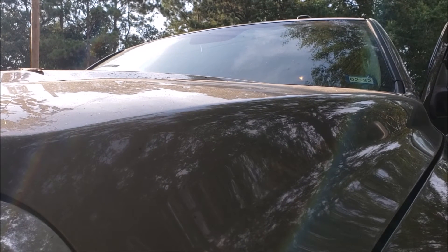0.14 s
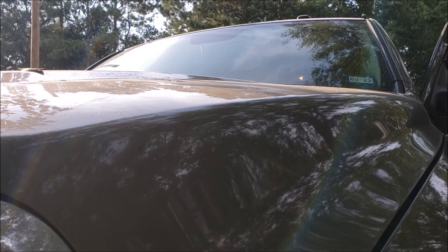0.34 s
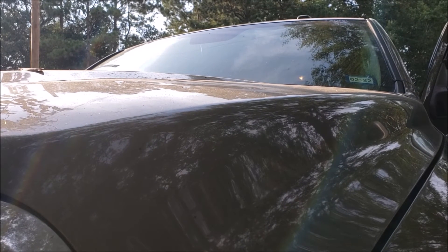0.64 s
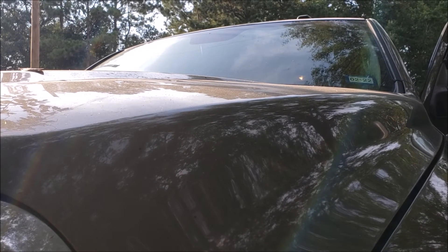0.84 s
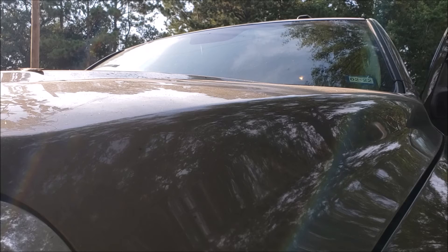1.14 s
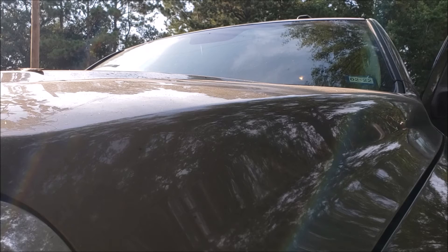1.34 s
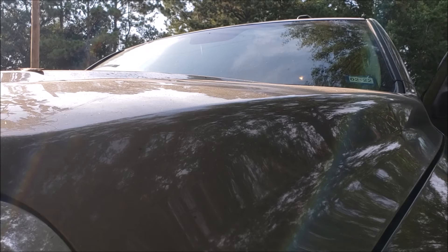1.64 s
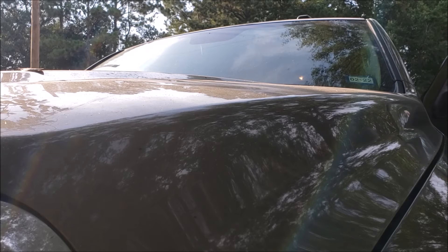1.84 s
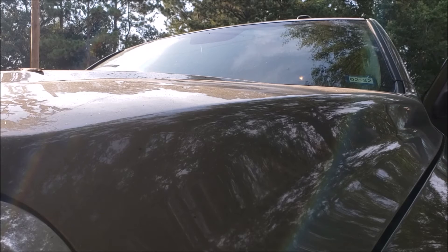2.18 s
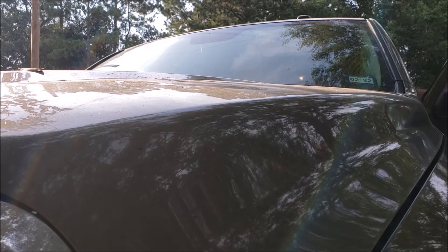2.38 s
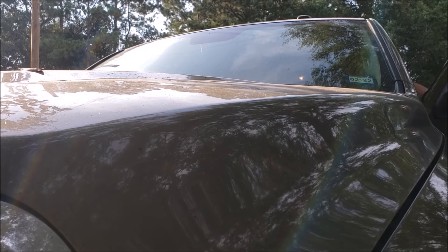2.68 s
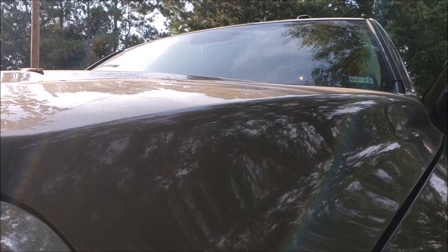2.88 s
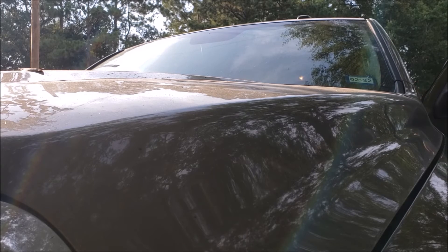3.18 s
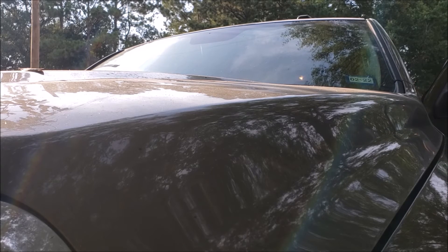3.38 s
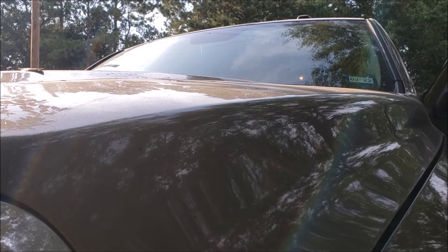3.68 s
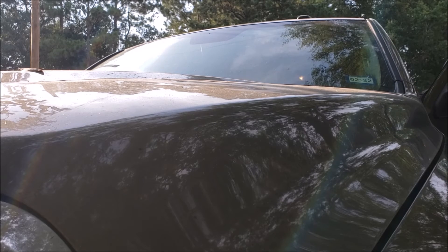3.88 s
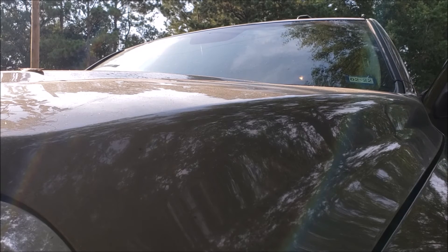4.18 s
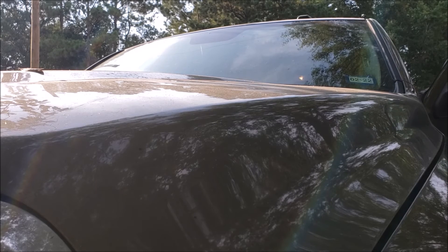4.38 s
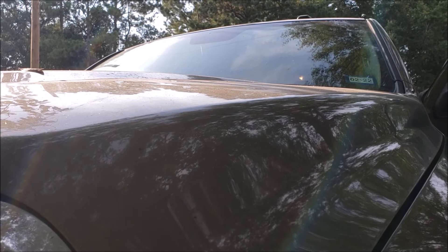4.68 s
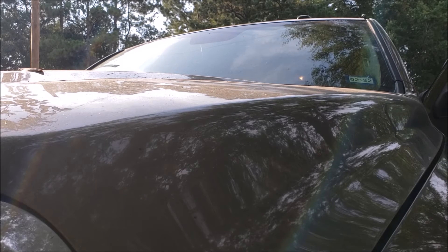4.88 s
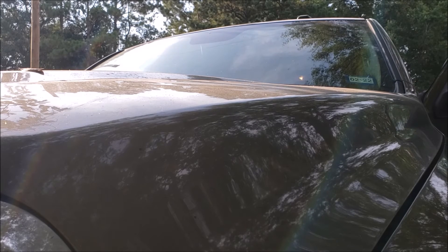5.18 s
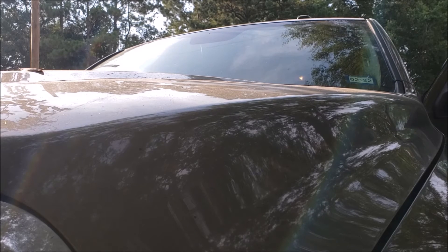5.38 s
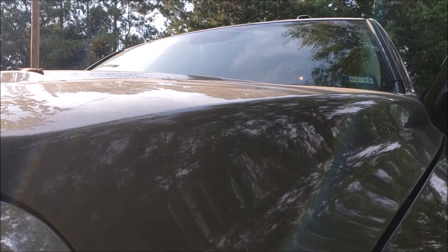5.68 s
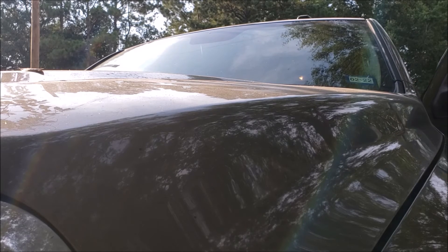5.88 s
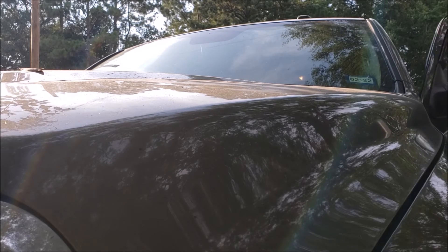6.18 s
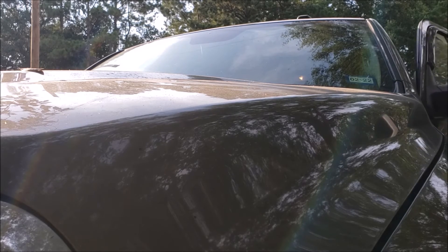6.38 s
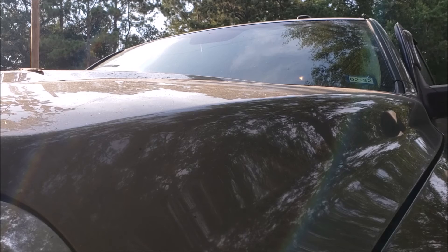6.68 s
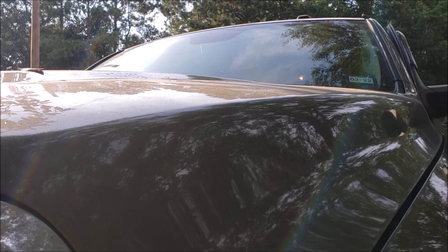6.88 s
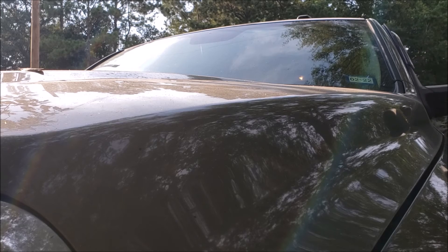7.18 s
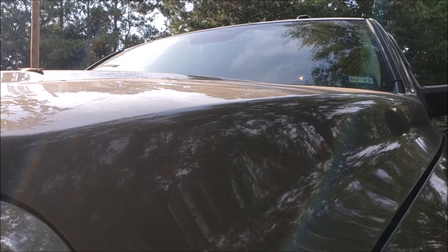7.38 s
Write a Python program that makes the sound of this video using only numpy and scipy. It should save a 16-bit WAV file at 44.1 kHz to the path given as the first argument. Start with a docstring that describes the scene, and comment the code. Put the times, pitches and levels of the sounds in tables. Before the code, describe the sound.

Close by a pickup's fender outdoors, the engine revs briefly, then rumbles roughly and eases down. Around three seconds a twin air horn fires three steady, brassy blasts, each a little longer, opening with a tiny squeal and ending with a quick dulling fade. Faint reflections return from walls and trees. The engine drops to a very quiet idle, and small knocks ring a door panel at the end.

```python
"""A pickup's engine revs under its closed hood and settles to idle; a twin air horn gives three blasts over it.
Each blast opens with a diaphragm squeal, then a low trumpet of summed harmonics beats against a weak higher one.
Pulse trains filtered by short all-pass paths make the slaps; crankshaft orders and shaped noise make the engine.
Walls and trees answer the horn, air hisses faintly, and near the end knocks ring a panel in the cab.
The microphone stands by the fender, and its gain ducks under the horn."""
import sys
import numpy as np
from scipy import signal
from scipy.fft import rfft, irfft, next_fast_len
from scipy.io import wavfile
from scipy.ndimage import uniform_filter1d, minimum_filter1d, map_coordinates

SR = 44100
rng = np.random.default_rng(int(sys.argv[2]) if len(sys.argv) > 2 else 0)


def unload_wav(signal):
    """Save mono or channel-first audio to the path in sys.argv[1] as 16-bit WAV at rate SR, clipped to [-1, 1]."""
    wavfile.write(
        sys.argv[1],
        SR,
        np.round(np.clip(np.atleast_2d(signal).T, -1, 1) * 32767).astype(np.int16),
    )


N = 332514
T = np.arange(N) / SR  # time of each sample [s]


def amp(db):
    """Level law: decibels become an amplitude ratio."""
    return np.exp(np.asarray(db) * (np.log(10) / 20))


def unit(x):
    """Normalisation: equal mean power, rms 1."""
    return x / np.sqrt(np.mean(x ** 2) + 1e-20)


def along(points, hz):
    """Interpolation of (frequency [Hz], value) points on a logarithmic frequency axis."""
    f, v = np.transpose(points)
    return np.interp(np.log(hz + 1), np.log(f + 1), v)


def curves(rows):
    """Linear interpolation in time: one curve for each column after the time."""
    s, *columns = np.transpose(rows)
    return [np.interp(T, s, column) for column in columns]


def wobble(rate, size=N):
    """Band-limited fluctuation: a smooth curve through `rate` random knots a second."""
    knots = rng.standard_normal(int(size * rate / SR) + 4)
    fine = map_coordinates(knots, [np.arange(len(knots) * 10) / 10], mode="nearest")
    return np.interp(np.arange(size) * (10 * rate / SR), np.arange(len(fine)), fine)


def swell(s, half_length):
    """Gaussian envelope: a bell-shaped rise and fall around a moment."""
    return np.exp(-((T - s) / half_length) ** 2)


def rise(t, width):
    """Smooth onset: a hyperbolic-tangent step from 0 to 1 around t = 0."""
    return .5 + .5 * np.tanh(t / width)


def turns(hz):
    """Phase is the running integral of frequency [rad]."""
    return 2 * np.pi * np.cumsum(hz) / SR


def filtered(x, response):
    """Linear filtering: the spectrum times a response of frequency."""
    n = x.shape[-1]
    m = next_fast_len(n + 8192)
    return irfft(rfft(x, m) * response(np.fft.rfftfreq(m, 1 / SR)), m)[..., :n]


def rush(spectrum, size=N):
    """Turbulence noise of rms 1, its stereo coherence high in the bass and low above."""
    def shape(hz):
        coherence = along([(200, 0.85), (1500, 0.07), (5000, 0.13)], hz)
        turn = np.arccos(np.clip(coherence, -1, 1)) / 2
        return amp(along(spectrum, hz)) * [np.cos(turn), np.sin(turn)]

    mid, side = filtered(rng.standard_normal((2, size)), shape)
    return unit(np.array([mid + side, mid - side]))


# harmonics of the high trumpet: (order, relative level [dB])
HIGH_TRUMPET = [(1, -47), (2, -50.5), (3, -60.5), (4, -54.5), (6, -52)]
# air rushing through the horn: (frequency [Hz], spectral level [dB per Hz])
AIR_SPECTRUM = [(250, -26.5), (500, -23.5), (640, -6.5), (800, -10.5), (1000, -7), (1500, -2.5), (2150, -8),
                (2450, -8.5), (3100, -6.5), (4300, -12.5), (8000, -29), (15000, -34)]


def blast(bay, opens, closes, pitch_hz):
    """Valve-driven diaphragm: it squeals, two trumpets beat, and the falling pressure dulls and fades them."""
    t = np.arange(round((opens - .02) * SR), round((closes + .2) * SR)) / SR
    size, speaks = len(t), opens + 0.039  # the squeal comes before the trumpet speaks
    since, emptying = np.maximum(t - speaks, 0), np.maximum(t - closes, 0)
    fade = amp(-25 * (emptying / 0.081) ** 3.3)
    slack = 1 - np.exp(-emptying / .024)  # lost share of the air pressure

    # the diaphragm starts a little sharp, never repeats a cycle exactly, and creeps sharp as the line empties
    low_hz = pitch_hz * (1 + .012 * np.exp(-since / 0.013) + 0.0087 * slack)
    phase = turns(low_hz) + 0.0039 * wobble(180, size)
    # the high trumpet slides up to a minor third above the low one
    interval = 6 / 5 - 0.067 * np.exp(-since / 0.083) + 0.0018 * wobble(31, size)
    high = turns(pitch_hz * interval)
    beat = high - phase
    beat = beat - np.interp(speaks + 0.003, t, beat)

    low = trumpet(phase, beat - 1, slack, pitch_hz, pull=0.052, throb=0.047, dulling_db=12.5, dispersion=0.0879)
    low = low * amp(0.097 * wobble(200, size))
    second = sum(amp(db - 15 * slack) * np.sqrt(2) * np.cos(k * high) for k, db in HIGH_TRUMPET)
    buzz = amp(-38.5 - 24 * slack) * rasp(phase, beat, bay, throb_db=13.5, scatter_db=.7)
    clatter = amp(-31.5 - 23.0 * slack) * chatter(phase, beat, bay, focus_db=21)
    air = amp(-38.5 - 3.4 * slack) * rush(AIR_SPECTRUM, size)
    air = air * (1 + .5 * np.cos(phase)) * (1 + 0.31 * np.cos(beat - 1))
    # the trumpet leaks faintly before it speaks in full
    leak = 0.11 * rise(t - opens - .012, 0.007) * rise(speaks - t, 0.017)
    voice = (low + second + buzz + clatter + air) * fade * (rise(t - speaks, 0.0026) + leak)

    start = squeal(t, mode_hz=1720, flap_hz=311.1, depth=1.4, rough=.007)
    start = start + amp(-11.5) * rush(AIR_SPECTRUM, size)
    flaps = rasp(turns(np.full(size, 311)), np.zeros(size), bay, throb_db=0, scatter_db=.7)
    start = start + amp(-17) * flaps
    start = start * amp(-21) * rise(t - opens - .01, .006) * rise(speaks - t, .009)
    whole = amp(8) * (voice + start)
    return np.pad(whole, ((0, 0), (round(t[0] * SR), N)))[:, :N]


# harmonics of the low trumpet through the hood: (order, relative left level [dB], relative right level [dB])
LOW_TRUMPET = [(1, -28.5, -30), (2, -17.5, -22.5), (3, -22, -22), (4, -25.5, -27), (5, -30.5, -46),
               (6, -25, -34), (7, -29, -27.5), (8, -29.5, -30.5), (10, -40, -42.5), (11, -32, -46),
               (12, -44.5, -50.5), (13, -33, -49.5), (14, -36, -40.5), (15, -43.5, -39), (16, -54.5, -47.5),
               (21, -44, -55.5), (22, -43, -47.5)]
# phase between the stereo ports: (frequency [Hz], lead of the left [rad])
PORT_LEAD = [(320, 0.0), (640, -0.4), (960, 0.45), (1270, -1.04), (1590, -16.5), (1910, -2.5), (2230, -3),
             (2550, -1.6), (3180, 1.84), (3500, -10.5), (3820, -5), (4780, -4.5)]


def trumpet(phase, beat, slack, pitch_hz, pull, throb, dulling_db, dispersion):
    """Mutual modulation: the beat tugs at each harmonic's phase and strength, most in the high orders."""
    out, cos_beat, sin_beat = np.zeros((2, len(phase))), np.cos(beat), np.sin(beat)
    for order, left_db, right_db in LOW_TRUMPET:
        grip = min(order, 2 + np.pi) - 1
        angle = order * phase + pull * grip * sin_beat - dispersion * order ** 2
        # as the pressure falls, the high harmonics go first
        dulling = amp(-dulling_db * slack * max(np.log(order / 2), 0))
        size = (1 + throb * grip * cos_beat) * dulling
        lead = along(PORT_LEAD, order * pitch_hz) * np.array([[.5], [-.5]])
        out += amp([[left_db], [right_db]]) * size * np.cos(angle + lead)
    return np.sqrt(2) * out


# overtones of the diaphragm's squeal: (order, relative level [dB])
SQUEAL_OVERTONES = [(1, 5), (2, -11.5), (3, -17), (4, -19)]


def squeal(t, mode_hz, flap_hz, depth, rough):
    """Amplitude modulation: a high mode of the diaphragm squeals, bent by its slow flapping."""
    mode = turns(mode_hz * (1 + rough * wobble(420, len(t))))
    flap = turns(flap_hz * (1 + rough * wobble(250, len(t))))
    sides = mode + np.array([[.3], [-.3]])  # phase of each port
    tone = sum(amp(db) * np.exp(1j * k * sides) for k, db in SQUEAL_OVERTONES)
    bending = 1 + depth * np.exp(1.1j) * np.cos(flap) + 0.22 * np.cos(2 * flap)
    bent = np.real(tone * bending)
    return unit(bent + amp(-4.5) * np.cos(2 * flap) + amp(-6.5) * np.cos(flap))


# colour of the diaphragm's slaps: (frequency [Hz], spectral level [dB per Hz])
RASP_SPECTRUM = [(2400, -40.5), (3400, -21), (4400, -5.5), (5000, -8), (5700, -12.5), (6500, -4.5),
                 (7200, -1.5), (8500, -16), (9800, -15), (11000, -6), (15000, -10.5), (16000, -14)]


def rasp(phase, beat, bay, throb_db, scatter_db):
    """Impact excitation: the diaphragm slaps hardest when both trumpets fall in step."""
    out_of_step = beat / (2 * np.pi) % 1
    strength_db = -throb_db * out_of_step + scatter_db * rng.standard_normal(len(phase))
    return slaps(phase, amp(strength_db), bay, RASP_SPECTRUM)


# ringing of the diaphragm's higher modes: (frequency [Hz], spectral level [dB per Hz])
CHATTER_SPECTRUM = [(500, -27.5), (1000, -8.5), (1500, -9.5), (1750, 1), (2200, -0.5), (2450, -11.5),
                    (3100, -14.5), (3500, -12.5), (4400, -7), (5200, -6), (6000, -10), (7100, -4.5),
                    (8400, -31.5), (15000, -33.5)]


def chatter(phase, beat, bay, focus_db):
    """Sidebands: harder slaps once a beat kick the higher modes, putting side tones around each harmonic."""
    kick = amp(focus_db * (np.cos(beat) - 1) + 0.91 * wobble(60, len(beat)))
    return slaps(phase, kick - kick.mean(), bay, CHATTER_SPECTRUM)


def slaps(phase, strength, bay, spectrum):
    """Periodic impulses: one slap of the diaphragm a cycle, smeared by the engine bay."""
    cycles = phase / (2 * np.pi)
    at = np.flatnonzero(np.diff(cycles // 1) > 0)
    # share each impulse between two samples, to keep its exact time
    late = (1 - cycles[at] % 1) / (cycles[at + 1] - cycles[at])
    train = np.zeros(len(phase))
    train[at], train[at + 1] = strength[at] * (1 - late), strength[at] * late
    smeared = signal.fftconvolve(train[None], bay, axes=1)[:, :len(phase)]
    return unit(filtered(smeared, lambda hz: amp(along(spectrum, hz))))


def engine_bay(count):
    """All-pass dispersion: short paths under the hood smear a click without colouring it, one answer per port."""
    bay = np.zeros((2, SR // 16))
    bay[:, 0] = 1
    for port, paths in enumerate(rng.uniform(.0002, .0018, (2, count))):  # round trips [s]
        for path_s in paths:
            loop = np.zeros(round(path_s * SR) + 1)
            loop[0], loop[-1] = 1, -.6
            bay[port] = signal.lfilter(loop[::-1], loop, bay[port])
    return bay


def hood(x):
    """Sympathetic resonance: the hood panel picks up the horn and hums on briefly after it."""
    hood_hz, width_hz = 326.8, 10
    damping = lambda hz: 1j * hz * width_hz
    return amp(-10) * filtered(x, lambda hz: damping(hz) / (hood_hz ** 2 - hz ** 2 + damping(hz)))


# walls that answer the horn: (delay [s], level [dB])
WALL_ECHOES = [(.055, -21.5), (.135, -40.5)]


def walls(horn):
    """Specular reflection: each wall returns a delayed, weaker copy."""
    return sum(amp(db) * np.pad(horn, ((0, 0), (round(delay * SR), 0)))[:, :N] for delay, db in WALL_ECHOES)


# crankshaft speed: (time [s], turns per second [Hz])
CRANK_SPEED = [(.12, 26), (.35, 20.2), (.5, 20), (.62, 21.5), (.76, 19.9), (1.7, 22.7), (2.15, 21.9),
               (3.35, 23.1), (3.65, 24.7), (3.88, 20.2), (4.9, 20.4), (6.3, 20.2), (6.7, 18.9)]
# how hard the engine works, from pulling to idle: (time [s], relative exhaust level [dB])
EXHAUST_EFFORT = [(.4, -33.5), (.8, -25), (1.2, -28), (2, -27), (2.45, -33), (3.3, -39), (4, -34),
                  (5, -34.5), (5.7, -41), (6.05, -50), (6.5, -47), (7.5, -54)]
# load lifts at peaks of speed: (time [s], half length [s], boost of the firing order [dB])
LOAD_LIFTS = [(0.1, 0.12, 15.5), (3.618, .14, 11)]
# exhaust tones beside the firing order: (multiple of crank speed, relative level [dB])
EXHAUST_ORDERS = [(3, -6), (3.5, -23), (5, -8), (5.5, -14), (6, -13), (6.5, -18.5), (7, -4), (7.5, -12.5),
                  (8, -3.5), (9, -18), (10.5, -14.5), (12, -9.5), (13, -11.5), (16, -18), (20, -26.5)]
# resonances of the exhaust pipe: (frequency [Hz], half width [Hz], boost [dB])
PIPE_RESONANCES = [(111.75, 7.9, 12), (147, 9, 8)]
# steady accessory hum: (frequency [Hz], relative level [dB])
ACCESSORY_HUM = [(113.3, -53.5), (182, -63), (226, -66), (242, -59)]
# roar of the engine bay: (time [s], relative rumble level [dB])
BAY_ROAR = [(0, -33.5), (.22, -31.5), (.45, -39), (.62, -32), (.87, -28.5), (1.6, -34), (2.6, -41.5),
            (3.7, -45), (5.2, -46), (6.3, -62), (7.5, -70)]
# fan hiss in that roar: (time [s], level over the rumble [dB])
FAN_OVER_RUMBLE = [(0, -17.5), (.8, -12), (2, -6), (3, -9), (3.7, -5.5), (5.5, -12.5), (7.5, -2.5)]
# noise colours of rumble, fan and idle: (frequency [Hz], spectral level [dB per Hz])
RUMBLE_SPECTRUM = [(20, -55.5), (45, -9), (90, -5.5), (160, -7), (215, -4), (270, 0), (370, -6),
                   (450, -2.5), (600, -14.5), (800, -25), (1500, -39), (4000, -71.5)]
FAN_SPECTRUM = [(400, -21), (700, -2.5), (980, -2), (1300, -8), (1900, -6), (2400, -5.5), (2800, -4),
                (3400, -7), (4200, -12.5), (7200, -18.5), (8400, -29), (10500, -25.5), (13000, -27.5),
                (16000, -34.5)]
IDLE_SPECTRUM = [(20, -15), (55, 3.5), (110, -5), (200, -6), (270, -2.5), (400, -18), (800, -28.5),
                 (2000, -58.5)]


def engine():
    """Order synthesis: exhaust tones locked to the crankshaft, with rumble and fan noise pulsed by the firing."""
    (crank_hz,), (exhaust_db,) = curves(CRANK_SPEED), curves(EXHAUST_EFFORT)
    (rumble_db,), (fan_db,) = curves(BAY_ROAR), curves(FAN_OVER_RUMBLE)
    # in a lift the uneven orders weaken and the firing order booms
    load = 1.5 - 0.46 * sum(swell(s, half) for s, half, db in LOAD_LIFTS)
    lift_db = sum(db * swell(s, half) for s, half, db in LOAD_LIFTS)
    shaft = turns(crank_hz * (1 + .003 * wobble(6)))

    uneven = np.zeros(N)
    for order, db in EXHAUST_ORDERS:
        # an order swells as it crosses a resonance of the exhaust pipe
        boom = sum(peak_db / (1 + ((order * crank_hz - hz) / width_hz) ** 2)
                   for hz, width_hz, peak_db in PIPE_RESONANCES)
        uneven += amp(db + boom + wobble(5)) * np.cos(order * shaft + rng.uniform(0, 2 * np.pi))
    firing = np.cos(4 * shaft)  # four firings a turn
    orders = amp(lift_db + 1.0) * np.sqrt(2) * firing + 1.21 * load * unit(uneven)
    tones = amp(exhaust_db - 7.0 + 1.2 * wobble(9)) * orders

    hum = np.zeros(N)
    for hz, db in ACCESSORY_HUM:
        hum += amp(db + 1.8 * wobble(3.0)) * np.sqrt(2) * np.cos(turns(hz * (1 + 0.0044 * wobble(2.2))))
    # the tones reach the left port first
    bass = filtered(tones + hum, lambda hz: np.exp(np.array([[.17j], [-.17j]])))
    rumble = amp(rumble_db) * rush(RUMBLE_SPECTRUM) * (1 + 0.18 * firing)
    fan = amp(rumble_db + fan_db + 0.55 * wobble(13.0)) * rush(FAN_SPECTRUM) * (1 + 0.077 * firing)
    idle = amp(-55.0) * rush(IDLE_SPECTRUM)
    return (bass + rumble + fan + idle) * amp([[1.1], [-1.2]])  # slightly to the left


# knocks in the cab: (time [s], relative thud level [dB], relative click level [dB])
CAB_KNOCKS = [(7.412, -49, -80), (7.465, -36, -33), (7.497, -46, -47)]
# modes of the door panel: (frequency [Hz], relative level [dB], decay by 60 dB [s])
PANEL_MODES = [(120, -2, 0.083), (239, -6, 0.14), (384, 0, 0.062), (570, -3.5, 0.082), (815, -10.5, 0.038),
               (1940, -11.5, 0.033)]


def knocks():
    """Modal decay: each knock rings the door panel, with a click where the contact is hard."""
    out, t = np.zeros((2, N + SR)), np.arange(SR // 4) / SR
    for s, thud_db, click_db in CAB_KNOCKS:
        ring = sum(amp(db + rng.normal(0, 3.4) - 60 * t / t60) * np.sin(2 * np.pi * hz * t)
                   for hz, db, t60 in PANEL_MODES)
        thud = amp(thud_db) * ring * (1 - np.exp(-t / 0.0012))
        hiss = rush([(300, 5.5), (2000, -5.5), (5000, -7), (15000, -16)], len(t))
        click = amp(click_db + 3.0 - 60 * t / 0.038) * hiss * (1 - np.exp(-t / 0.0061))
        out[:, round(s * SR):][:, :len(t)] += thud + click
    return out[:, :N]


# reverberation of the trees: (frequency [Hz], decay by 60 dB [s])
TREE_DECAY = [(200, 0.82), (2000, 1.8), (5000, 0.82), (12000, 0.28)]


def trees(x):
    """Diffuse scattering: a long faint answer from the trees; moving leaves blur its pitch."""
    hz, t, z = signal.stft(rng.standard_normal((2, SR)), SR, nperseg=256)
    decay = amp(-60 * t / along(TREE_DECAY, hz)[:, None]) * (1 + 5 * np.exp(-t / 0.016))
    tail = signal.istft(z * decay, SR, nperseg=256)[1]
    colour = [(300, 5.5), (650, -11), (2000, -7.0), (8000, 1)]
    tail = filtered(tail / np.linalg.norm(tail[0]), lambda hz: amp(along(colour, hz)))
    scattered = x * wobble(260)
    delayed = np.pad(scattered, ((0, 0), (900, 0)))  # samples of delay
    return signal.fftconvolve(delayed, tail, axes=1)[:, :N]


# outdoor air: (frequency [Hz], spectral level [dB per Hz])
OUTDOOR_SPECTRUM = [(290, -26.5), (500, -5.5), (750, -3), (900, -1.5), (1300, -1), (2000, -8.5), (2750, -6),
                    (3200, -2.5), (3700, -11.5), (4700, -9), (7300, -16), (8500, -32), (10200, -12.5),
                    (12000, -30.5), (16000, -32)]
# thin puffs of hiss: (time [s], half length [s], level [dB])
HISS_PUFFS = [(2.187, .035, -61.5), (2.764, .06, -58)]


def outdoors():
    """Broadband ambient noise: faint air in the trees, with two thin puffs of hiss."""
    puffs = sum(amp(db) * swell(s, half) for s, half, db in HISS_PUFFS)
    hiss = puffs * rush([(5000, -35.5), (11000, -4.0), (14500, -1.0), (16000, -8.0)])
    return amp(-61 + .6 * wobble(2.4)) * rush(OUTDOOR_SPECTRUM) + hiss


# horn blasts: (valve opens [s], valve closes [s], settled pitch [Hz])
HORN_BLASTS = [(3.112, 3.476, 317.6), (3.84, 4.306, 318.4), (4.579, 5.160, 318.3)]


def scene():
    """Superposition: horn and engine under one hood, with their surroundings out of doors."""
    bay = engine_bay(count=7)
    horn = sum(blast(bay, *row) for row in HORN_BLASTS)
    answers = hood(horn) + walls(horn) + amp(-23.5) * trees(horn)
    return horn + answers + engine() + knocks() + outdoors()


def gain_control(x):
    """Dynamic range control: the gain ducks under a loud sound, holds through short gaps, then creeps back."""
    ceiling_db, limit_db = -13.5, -11.2
    hold_s, recover_db_per_s, duck_s = 0.68, 3, .1
    level_db = 10 * np.log10(np.abs(uniform_filter1d(np.mean(x ** 2, axis=0), size=441)) + 1e-12)
    hold = 2 * round(hold_s * SR / 2) + 1
    excess_db = np.minimum(ceiling_db - level_db, 0)
    needed_db = minimum_filter1d(excess_db, hold, origin=hold // 2, mode="nearest")
    gain_db = np.minimum.accumulate(needed_db - recover_db_per_s * T) + recover_db_per_s * T
    step = 1 / (duck_s * SR)
    gain_db = signal.lfilter([step], [1, step - 1], gain_db)
    # above the limit the gain ducks without that lag
    gain_db = np.minimum(gain_db, limit_db - level_db)
    return x * amp(uniform_filter1d(gain_db, size=220))


def record(dry):
    """Band limiting: the recorder rides its gain and keeps nothing above 15950 Hz."""
    return filtered(gain_control(dry), lambda hz: hz < 15950)


dry = scene()
out = record(dry)
unload_wav(out)
```